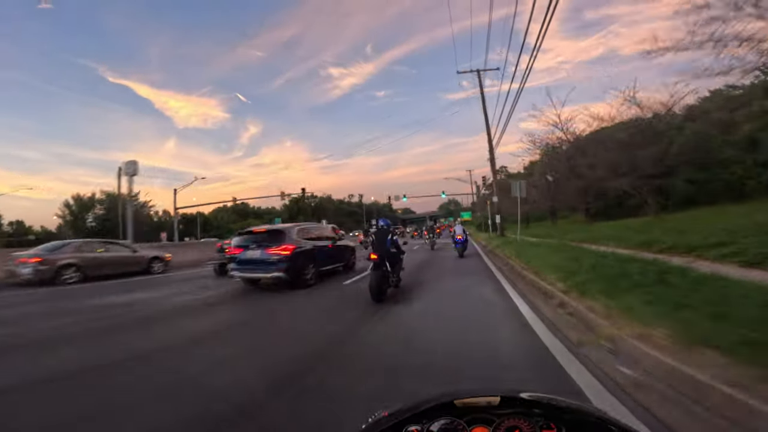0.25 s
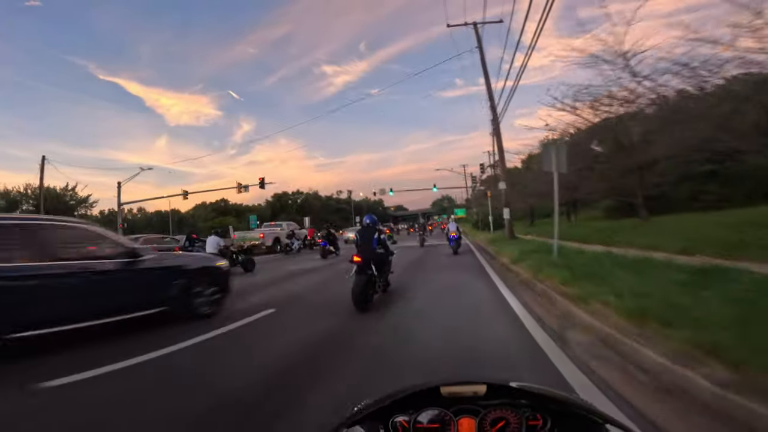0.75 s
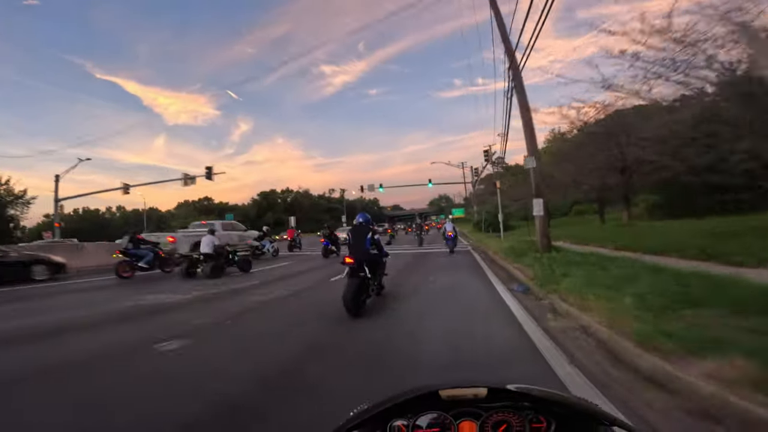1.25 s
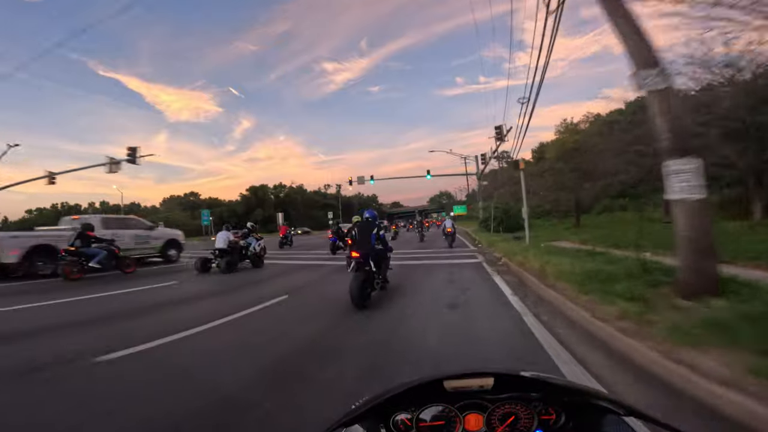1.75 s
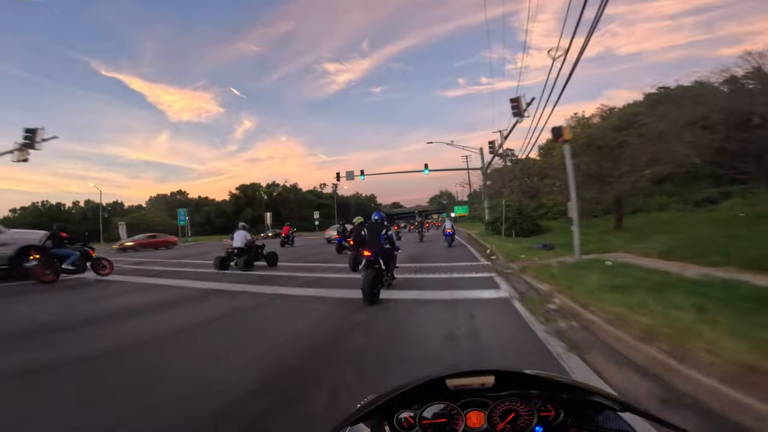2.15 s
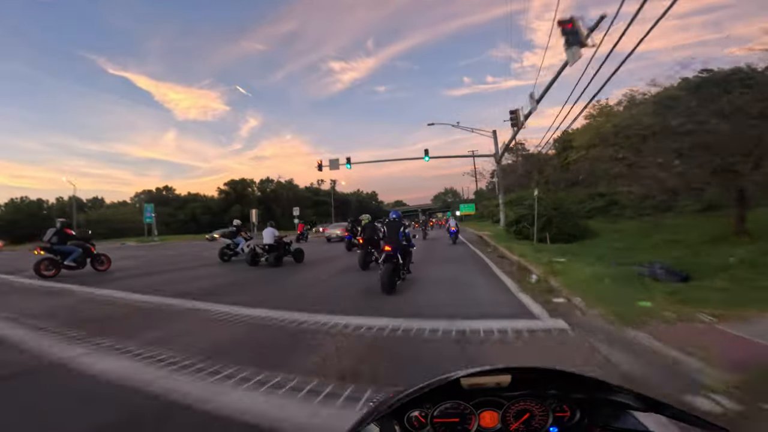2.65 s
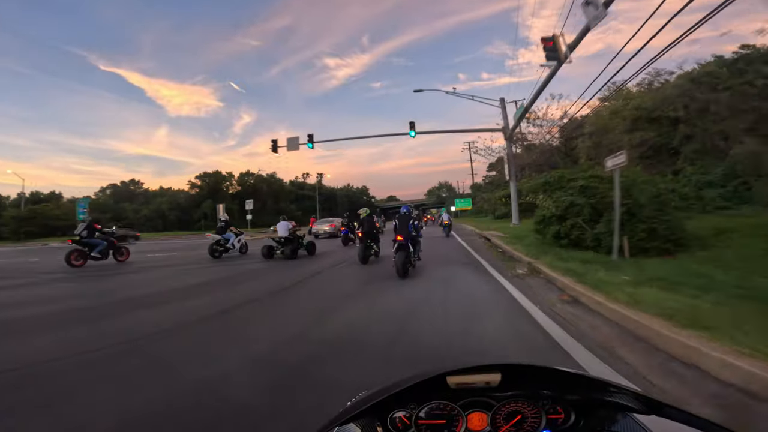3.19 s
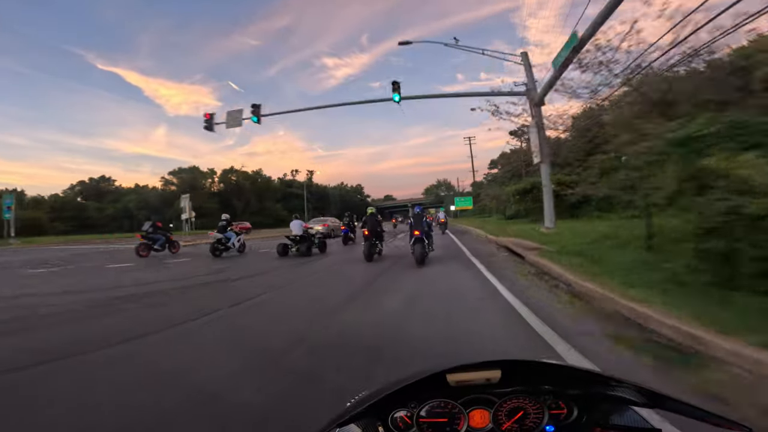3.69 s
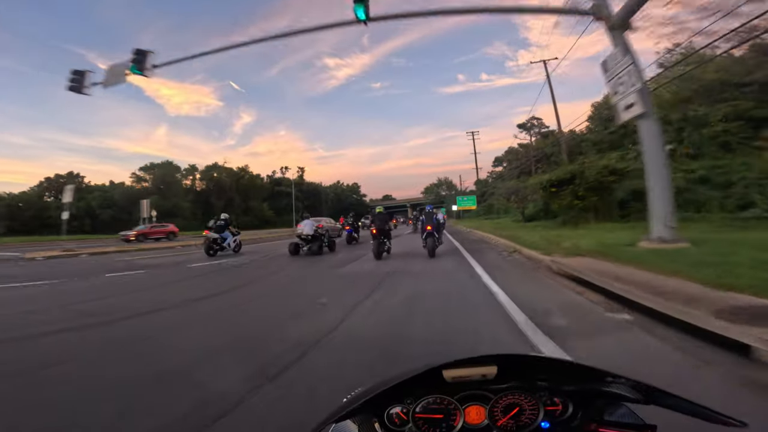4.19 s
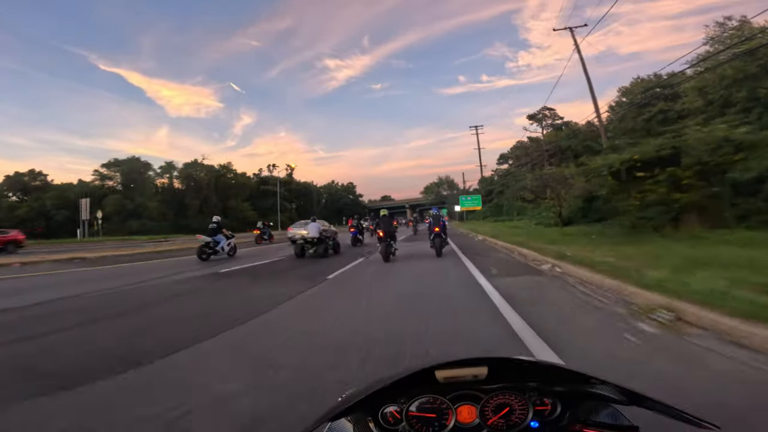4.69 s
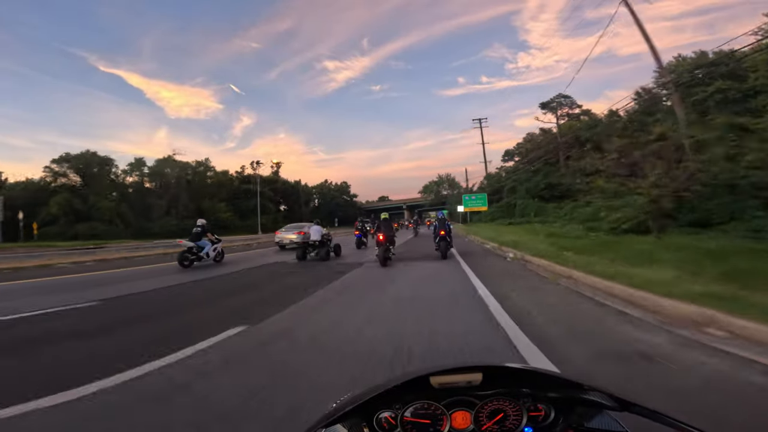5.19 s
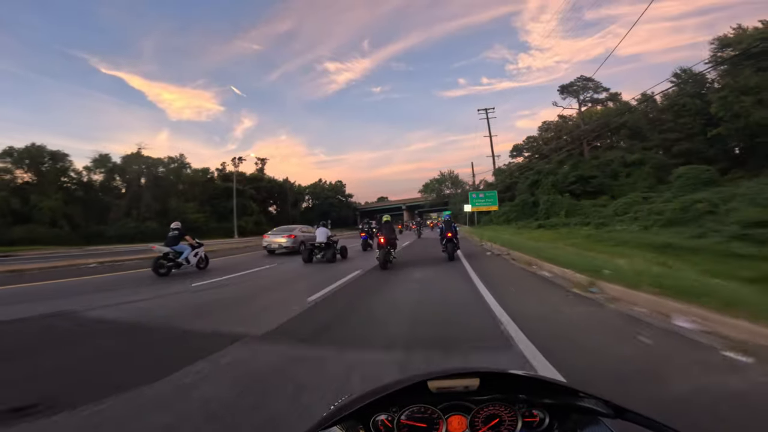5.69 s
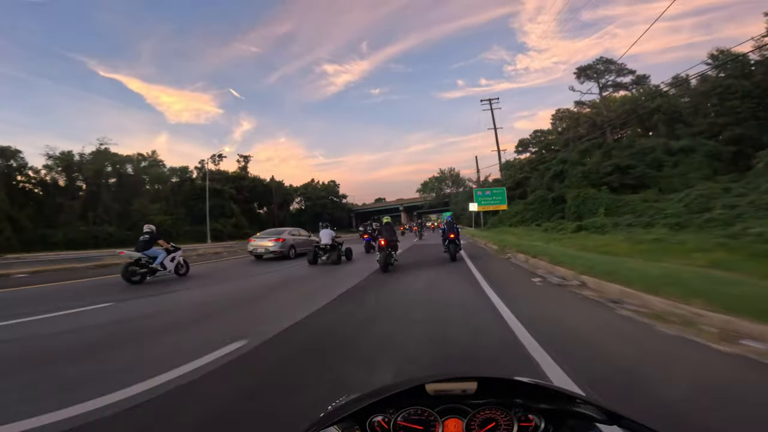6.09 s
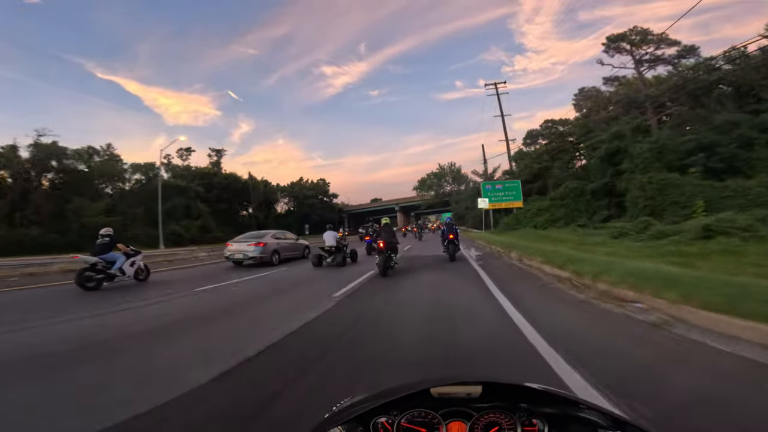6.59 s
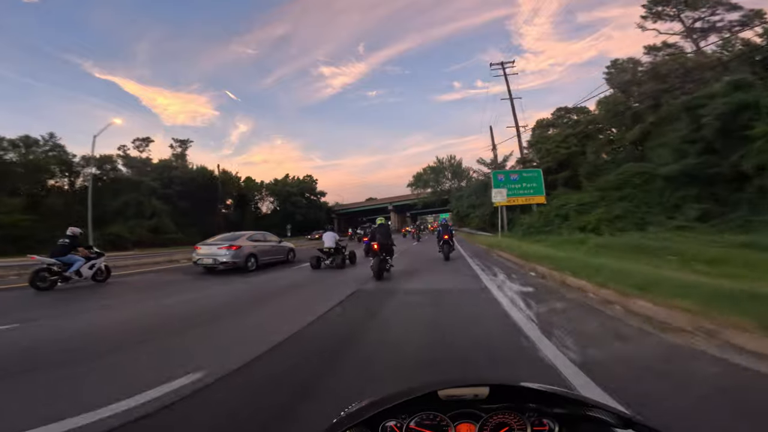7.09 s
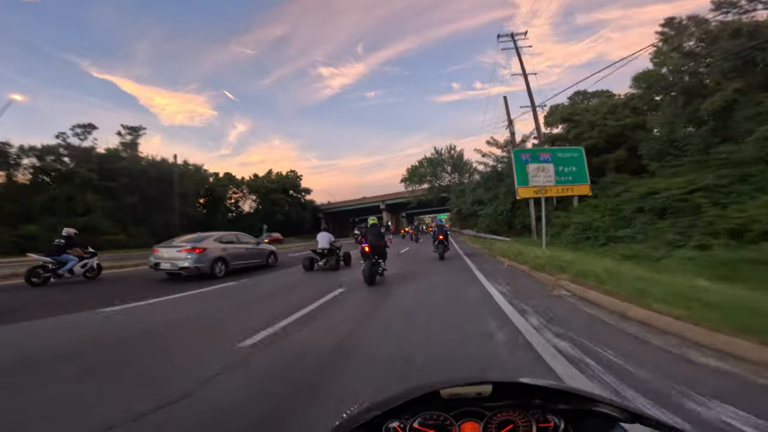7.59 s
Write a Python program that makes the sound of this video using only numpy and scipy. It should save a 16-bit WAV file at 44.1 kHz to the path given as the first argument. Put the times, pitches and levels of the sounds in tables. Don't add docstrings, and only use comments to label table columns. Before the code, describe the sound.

Heard from a moving motorcycle on an open city road, the close engine climbs in pitch then hums steadily, knocking with a ticking loose panel. A rough twin surges, shuts off and pops just after four seconds, while a smooth four-cylinder bike gains speed. Later another rises with bright throttle stabs. Pack drone, wind rumble, hiss and bodywork thumps continue throughout.

```python
import sys
import numpy as np
from scipy import signal
from scipy.fft import rfft, irfft, next_fast_len
from scipy.io import wavfile
from scipy.ndimage import uniform_filter1d, map_coordinates

SR = 44100
rng = np.random.default_rng(int(sys.argv[2]) if len(sys.argv) > 2 else 0)


def undo_db(level):
    steps = np.asarray(level, float) / 20
    return 10 ** steps


def wav_record(signal):
    frames = np.transpose(np.atleast_2d(signal))
    bounded = np.clip(frames, -1, 1)
    quanta = np.round(bounded * 32767).astype(np.int16)
    wavfile.write(sys.argv[1], SR, quanta)


N = 346185
TIME = np.arange(N) / SR
SLOW = TIME[::32]

# time_s, cycle_rate_hz, nearness_db, throttle_0_to_1
OWN_RIDE = [(0.0, 40.73, -0.5, 0.89), (0.18, 40.85, -2.5, 0.7), (0.7, 42.98, -6.5, 0.92),
            (1.05, 44.3, -2, 0.77), (1.4, 46.33, -1, 0.75), (1.92, 50.39, -1.5, 0.73),
            (2.45, 54.4, -5, 0.88), (2.62, 53.94, 0, 0.5), (2.97, 53.68, -7, 0.1), (3.85, 53.35, -1.5, 0),
            (4.38, 53.3, -1.5, 0.51), (4.9, 53.85, 3.5, 0), (5.07, 54.64, 1, 0.35), (5.78, 56.05, 3, 0.17),
            (6.3, 56.57, 1, 0.29), (6.82, 55.95, 1, 0.13), (7.18, 55.74, 1, 0.4), (7.85, 55.75, -2, 0.3)]
TWIN_RIDE = [(0.0, 24.34, -3, 0.11), (0.35, 25.02, -0.5, 0.046), (0.7, 24.33, 1.5, .02),
             (1.22, 22.69, -0.5, 0.016), (1.58, 22.23, 2, 0.22), (1.75, 24.6, 0, 0.43),
             (2.1, 31.86, 2, 0.68), (2.28, 31.64, -2, 0.75), (2.45, 28.67, -3, 0.79),
             (2.62, 28.14, -2, 0.65), (2.8, 29.18, 0.5, 0.79), (2.97, 31.56, 2, 0.65),
             (3.5, 37.45, 0, 0.87), (4.03, 43.05, -1.5, 0.95), (4.07, 42.78, 2.5, 0.13),
             (4.6, 36.37, 1, 0.64), (4.75, 36.1, -3, 0.096), (5.95, 34.64, 1.5, .1)]
RACER_RIDE = [(5.4, 31.28, -8.5, 0.21), (5.9, 33.4, -5.5, 0.33), (6.85, 38.65, -0.5, 0.51),
              (6.97, 39.75, 0.5, 0.56), (7.15, 41.25, 3.5, 0.23), (7.45, 45.3, 0.5, 0.75),
              (7.55, 46.63, 1, 0.78), (7.78, 48.94, 0, 0.92), (7.85, 50.5, 0.5, 0.44)]
CRUISER_RIDE = [(3.6, 29.84, -14, 0.33), (3.95, 32.07, -1.5, 0.35), (4.65, 33.39, 0.5, 0.46),
                (5.35, 34.47, -1.5, 0.11), (6.05, 35.88, -2.5, 0.4), (6.4, 36.34, -5, 0.88),
                (6.75, 36.41, 2.5, 0.51), (7.45, 36.99, -2.5, 0.69), (7.8, 37.09, 1.5, 0.61)]
# multiple_of_cycle_rate, level_db
OWN_TONES = [(1, -25), (2, -26), (3, -27.5), (4, -24.5), (5, -22), (6, -26), (7, -28.5), (8, -30), (9, -28),
             (10, -30.5), (11, -29), (12, -25.5), (13, -22.5), (14, -36), (15, -27.5), (16, -29), (17, -28),
             (18, -28.5), (19, -29.5), (20, -30), (21, -32.5), (22, -33), (23, -29.5), (24, -35),
             (25, -29.5), (26, -28.5), (27, -28), (28, -28.5), (29, -31)]
TWIN_TONES = [(2, -31), (2.988, -27.5), (3.993, -34), (4.998, -22.5), (5.99, -26), (8.05, -26),
              (9.025, -31.5), (10.05, -30), (11.02, -26), (11.88, -31), (13.08, -28), (14.04, -29),
              (15.99, -31.5), (16.91, -29.5), (18.1, -31), (18.87, -28), (19.95, -29.5), (7.025, -34),
              (15, -33.5), (20.88, -35), (22, -34), (23, -30), (24, -32.5), (25.4, -35), (25.9, -30.5),
              (27.4, -29.5)]
RACER_TONES = [(2, -34), (4, -20.5), (6, -34.5), (8, -24), (10, -36), (12, -18), (16, -29), (20, -22),
               (22, -36), (24, -22.5), (28, -22), (32, -23.5), (36, -23.5), (40, -32.5)]
CRUISER_TONES = [(3, -39.5), (4, -28.5), (6, -30.5), (7, -35), (8, -28), (9, -27), (11, -43.5), (12, -24),
                 (14, -28), (16, -29.5), (20, -30.5), (24, -29), (28, -30.5), (36, -29.5)]
OWN_GROUPS = (5, 10, 14)
TWIN_GROUPS = (4, 5, 14)
RACER_GROUPS = (4, 12, 22)
CRUISER_GROUPS = (6, 10, 14)
# low_db, firing_db, middle_db, high_db
OWN_OPENS = [3.5, 5.3, 0.3, 9.1]
TWIN_OPENS = [1.5, -2, 5, 6]
RACER_OPENS = [0.3, 3.7, 6, 2.8]
CRUISER_OPENS = [0.3, 1.5, 4, 9]
# pitch_hz, level_db
SHELTER = [(60, -8), (120, 2.5), (170, 0.5), (212, 2.5), (270, -1.5), (420, 3), (520, -7.5), (600, -12),
           (690, -9), (760, -18), (830, -16.5), (950, -24), (1150, -30), (1800, -31)]
# pitch_hz, width_hz, full_throttle_db
AIRBOX = [(212, 39, 3.5), (405, 40, 4.5), (650, 40, 1.5), (829, 45, 10), (1087, 120, 14.5)]

# time_s, pitch_hz
PANEL_PITCH = [(0, 7490), (1.62, 7500), (1.7, 6840), (1.85, 7350), (1.9, 6850), (2.38, 6820), (2.54, 6400),
               (4, 7400), (4.7, 7200), (4.9, 6860), (5.7, 6920), (6.1, 7260), (7.85, 6860)]
# pitch_hz, width_hz,
# rest_level_db
PANEL_MODES = [(5100, 550, -67), (8200, 700, -72), (9400, 1100, -73.5), (11500, 1200, -80),
               (13400, 1300, -81)]
# start_s, full_s, end_s, strength_db
MODE_SPELLS = [
    [(2.0, 2.2, 2.3, 13), (3.4, 3.6, 3.1, 21.5), (5.3, 5.45, 5.6, 12), (6.7, 6.8, 7.4, 8.5)],
    [(.85, .9, 1.85, 9), (2.0, 2.15, 2.5, 12), (5.5, 5.58, 5.63, 10), (6.7, 6.95, 7.1, 9)],
    [(1.55, 1.6, 2, 7), (1.9, 2.15, 2.3, 14.5), (2.42, 2.47, 2.52, 18), (3.5, 3.8, 3.6, 9),
     (4.75, 4.85, 5.0, 5), (5.1, 5.3, 5.45, 8.5), (5.45, 5.55, 5.62, 14.5), (5.7, 5.8, 6, 6),
     (6.8, 6.95, 7.0, 8.5), (7.2, 7.3, 7.9, 13.5)],
    [(1.55, 1.7, 2, 11.5), (1.95, 2.05, 2.3, 11), (5.4, 5.55, 6.1, 9), (5.7, 5.9, 6.7, 7.5),
     (6.7, 6.8, 7.35, 11.5), (7.6, 7.7, 8.7, 14.5)],
    [(-.2, -.05, 0, 8), (1.55, 1.7, 1.8, 11), (1.95, 2.05, 2.2, 9), (5.4, 5.55, 6.7, 6),
     (6.7, 6.8, 10, 8.5)],
]
# start_s, full_s, end_s, strength_db
LOOSE_SPELLS = [(.8, .9, 2, 8), (1.68, 1.73, 1.86, 17), (1.86, 1.93, 2.5, 18.5), (2.0, 2.1, 2.3, 21),
                (2.42, 2.47, 2.51, 21), (3.0, 3.6, 4.4, 3.5), (4.06, 4.1, 4.18, 4.5), (4.55, 4.62, 4.75, 7),
                (4.78, 4.86, 5.0, 13), (5.05, 5.15, 5.75, 12.5), (5.35, 5.55, 5.62, 18.5),
                (5.9, 5.95, 6.35, 8), (6.5, 6.55, 5.4, 18), (6.7, 6.95, 6.5, 13)]
# start_s, full_s, end_s, strength_db
STRAIN_SPELLS = [
    (-.3, 0, 2.1, 7.5),
    (3.6, 3.8, 4.45, 5.5),
    (4.5, 4.75, 5.75, 7.5),
    (5.7, 5.8, 9.4, 5),
]
# pitch_hz, width_hz, level_db
CASING = [(1070, 310, 2.5), (2170, 186, 6), (2567, 366, -3), (3850, 350, -8), (5100, 900, -15.5)]

# pitch_hz, width_hz, level_db
PIPE = [(960, 257, 7.5), (1520, 260, 6.5), (2400, 260, -1), (5370, 830, -9), (6650, 620, -15.5)]
# time_s, level_db, length_s
POPS = [
    (4.287, -40, .035),
    (4.408, -39, .015),
    (4.488, -36.5, 0.017),
    (4.642, -41, 0.047),
]

# time_s, level_db
GUSTS = [(0, -19), (.5, -38.5), (1.47, -22), (2.94, -25.5), (3.43, -19.5), (3.92, -25.5), (5.4, -27.5),
         (5.9, -27), (6.4, -26), (7.85, -27)]
# time_s, nearness_db
PACK = [(0, -1.5), (1, -0.5), (1.5, -3), (3.9, -3), (4.4, -7.5), (5.4, -4.5), (6.9, -5.5), (7.85, -2)]
# pitch_hz, level_db_per_hz
WIND_COLOUR = [(8.8, -34), (15, 0), (70, -7.5), (110, -9), (140, -32.5), (240, -120)]
DRONE_COLOUR = [(41, -30.5), (70, -11), (199, -1.5), (372, -5), (415, -5.5), (552, -16.5), (677, -17.5),
                (786, -20), (1210, -30), (1800, -31.5), (2340, -59), (3960, -120)]
HISS_COLOUR = [(900, -29), (1400, -13), (2300, -4.5), (3000, -13), (3450, -17), (5300, -17.5), (7000, -24),
               (9000, -29), (12500, -36.5), (15300, -47), (16500, -83.5)]

# time_s, peak_db,
# top_end_db
JOLTS = [(1.806, -13, -47.5), (1.906, -17, -56), (2.103, -16, -54), (2.385, -12.5, -64.5),
         (2.459, -15.5, -52), (2.757, -10.5, -67), (2.976, -17.5, -63.5), (3.188, -16.5, -60),
         (3.612, -14.5, -57), (3.789, -13, -59), (4.306, -14, -65), (4.409, -13, -66), (4.488, -14, -63),
         (4.629, -16, -60), (5.081, -21, -58), (5.379, -17.5, -51), (5.596, -15, -45), (5.935, -19, -50),
         (6.329, -24.5, -61.5), (6.402, -17.5, -63), (6.774, -17.5, -51), (6.791, -18, -55),
         (6.841, -14.5, -58), (6.877, -19.5, -52), (7.03, -17.5, -52.5), (7.2, -17.5, -55),
         (7.561, -15.5, -52), (7.711, -20, -48.5)]
# pitch_hz, width_hz, level_db
BODYWORK = [(700, 570, 0.5), (1500, 560, -6.5), (2300, 830, -11.5)]
# start_s, full_s, end_s, high_tones_gain_db
STABS = [
    (6.05, 6.25, 6.55, 9),
    (6.86, 6.94, 7.06, 13),
    (7.28, 7.34, 7.45, 8),
    (7.47, 7.53, 7.72, 15),
    (7.74, 7.8, 7.9, 13),
]

SETTLE_S = 0.11


def unit(x):
    return x / np.sqrt(np.mean(x ** 2) + 1e-20)


def curves(rows):
    time_s, *columns = np.transpose(rows)
    return [np.interp(TIME, time_s, column) for column in columns]


def sounding(rows, fade):
    inside = np.minimum(TIME - rows[0][0], rows[-1][0] - TIME)
    return np.clip(inside / fade + 1, 0, 1)


def spells(rows, settle_s):
    start, full, end, strength_db = np.transpose(rows)[..., None]
    rise = (SLOW - start) / np.maximum(full - start, 1e-3)
    fall = (end - SLOW) / settle_s + 1
    shape = np.clip(np.minimum(rise, fall), 0, 1)
    return np.interp(TIME, SLOW, np.max(strength_db * shape, axis=0))


def drifting(rate):
    knots = rng.standard_normal(int(N * rate / SR) + 4)
    return map_coordinates(knots, [SLOW * rate])


def wobble(rate):
    return np.interp(TIME, SLOW, drifting(rate))


def along(points, hz):
    point_hz, db = np.transpose(points)
    return np.interp(np.log(hz + 1), np.log(point_hz + 1), db)


def filtered(x, response):
    size = next_fast_len(N + 8192)
    return irfft(rfft(x, size) * response(np.fft.rfftfreq(size, 1 / SR)), size)[:N]


def resonances(modes):
    def response(f):
        total = 0
        for k, (centre, width, db) in enumerate(modes):
            ring = 1j * f * width / (centre * centre - f * f + 1j * f * width)
            total = total + (-1) ** k * undo_db(db) * ring
        return total
    return response


def muffled(modes, top_hz):
    return lambda f: resonances(modes)(f) / (1 + 1j * f / top_hz) ** 2


def rush(colour, patchy_db):
    noise = signal.stft(rng.standard_normal(N), nperseg=512)[2]
    patches = uniform_filter1d(rng.standard_normal(noise.shape), 5, 0)
    patches = unit(uniform_filter1d(patches, 10, 1))
    patchy = signal.istft(noise * undo_db(patchy_db * patches), nperseg=512)[1][:N]
    return unit(filtered(patchy, lambda hz: undo_db(along(colour, hz))))


def bursts(turns, life_s, scatter_db, clean):
    count = np.floor(turns).astype(int)
    strength = undo_db(scatter_db * rng.standard_normal(1000))[count % 1000]
    kicks = np.append(0, np.diff(count) > 0) * strength
    keep = np.exp(-1 / (life_s * SR))
    swell = signal.lfilter([1], [1, -keep ** 3], kicks)
    gate = signal.lfilter([1], [1, -keep], swell)
    return clean * unit(kicks) + unit(gate * rng.standard_normal(N))


def engine(ride, tones, groups, opens_db, rough, unsteady_db, airbox=(), stab_db=0):
    hz, near_db, throttle = curves(ride)
    turns = np.cumsum(hz) / SR
    on = sounding(ride, fade=0.13) > 0
    uneven = (turns + rough * wobble(14))[on]
    group_db = [(near_db + 2 * db * (throttle - 0.5))[::32] for db in opens_db]
    group_db[-1] = group_db[-1] + stab_db
    note = np.zeros(N)
    for multiple, db in tones:
        tone_hz = multiple * hz[::32]
        swing_db = group_db[np.searchsorted(groups, multiple)] + unsteady_db * drifting(7)
        for centre, width, gain_db in airbox:
            swing_db += throttle[::32] * gain_db * np.exp(-((tone_hz - centre) / width) ** 2)
        level = np.interp(TIME[on], SLOW, undo_db(db + swing_db + along(SHELTER, tone_hz)))
        note[on] += level * np.sin(2 * np.pi * (multiple * uneven + rng.random()))
    return np.sqrt(2) * note * sounding(ride, fade=0.19), turns, throttle


def casing_knock(turns, loose_db):
    blows = bursts(turns + 0.28, life_s=0.001, scatter_db=1.2, clean=4.5)
    blows = blows + 0.75 * bursts(turns + 0.8, life_s=0.00065, scatter_db=1.5, clean=1.5)
    blows = blows + 1.8 * rng.standard_normal(N)
    knock_db = -49.5 + 0.2 * loose_db + spells(STRAIN_SPELLS, SETTLE_S)
    return undo_db(knock_db) * unit(filtered(blows, muffled(CASING, top_hz=5000)))


def panel_tick(turns, loose_db):
    taps = bursts(turns + 0.26, life_s=0.0005, scatter_db=1.5, clean=3)
    taps = taps + 0.25 * bursts(turns + 0.5, life_s=0.0004, scatter_db=2.5, clean=0.6)
    broad = filtered(taps, lambda f: 1 / (1 + 1j * f / 620) ** 3)
    pitch_hz = curves(PANEL_PITCH)[0]
    tick = undo_db(-71 + loose_db) * unit(broad * np.sin(2 * np.pi * np.cumsum(pitch_hz) / SR))
    buzz = unit(taps) + 0.55 * rng.standard_normal(N)
    for (hz, width, db), rows in zip(PANEL_MODES, MODE_SPELLS):
        mode = resonances([(hz, width, 0)])
        level_db = db + spells(rows, SETTLE_S / 2) + 2.5 * wobble(25)
        tick = tick + undo_db(level_db) * unit(filtered(buzz, lambda f: mode(f) ** 2))
    return tick


def own_bike():
    note, turns, _ = engine(OWN_RIDE, OWN_TONES, OWN_GROUPS, OWN_OPENS,
                            rough=0.0025, unsteady_db=1.8, airbox=AIRBOX)
    loose_db = spells(LOOSE_SPELLS, SETTLE_S / 2)
    return note + casing_knock(turns, loose_db) + panel_tick(turns, loose_db)


def twin():
    note, turns, throttle = engine(TWIN_RIDE, TWIN_TONES, TWIN_GROUPS, TWIN_OPENS,
                                   rough=0.004, unsteady_db=2)
    puffs = bursts(turns + 0.03, life_s=0.0007, scatter_db=1.2, clean=3)
    puffs = puffs + 0.9 * bursts(turns + 0.65, life_s=0.0007, scatter_db=1.2, clean=3)
    bark = unit(filtered(puffs, muffled(PIPE, top_hz=5130)))
    bark_level = undo_db(-52 + 20.5 * throttle) * sounding(TWIN_RIDE, fade=0.24)
    pops = sum(undo_db(db) * np.exp(-((TIME - s) / length) ** 4) for s, db, length in POPS)
    dull = unit(filtered(bark, lambda f: 1 / (1 + 1j * f / 4000) ** 2))
    return note + bark_level * bark + pops * dull


def wind():
    rumble = unit(undo_db(wobble(14)) * rush(WIND_COLOUR, patchy_db=1.0))
    return undo_db(curves(GUSTS)[0] + 0.5) * rumble


def pack_drone():
    level_db = -14.5 + curves(PACK)[0] + 0.73 * wobble(6.6)
    return undo_db(level_db) * rush(DRONE_COLOUR, patchy_db=1.0)


def road_hiss():
    hz = curves(OWN_RIDE)[0]
    speed_db = 3.5 * np.log2(hz / hz.mean())
    level_db = -42.5 + speed_db + 0.53 * curves(PACK)[0] - 4 * curves(TWIN_RIDE)[2]
    return undo_db(level_db + 0.56 * wobble(30)) * rush(HISS_COLOUR, patchy_db=1.5)


def jolts():
    thump, splash, t = np.zeros(N + SR), np.zeros(N + SR), TIME[:1200]
    for s, db, top_db in JOLTS:
        start = round(s * SR)
        thump[start] = undo_db(db)
        splash[start:start + len(t)] += undo_db(top_db) * np.exp(-t / 0.002) * rng.standard_normal(len(t))
    body = muffled(BODYWORK, top_hz=1800)
    dull = filtered(thump[:N], lambda f: body(f) / (1 + 1j * f / 3000) ** 2)
    bright = filtered(splash[:N], lambda f: resonances([(11000, 6000, 0)])(f) ** 2)
    return undo_db(23) * dull + undo_db(2) * bright


def cruiser():
    return engine(CRUISER_RIDE, CRUISER_TONES, CRUISER_GROUPS, CRUISER_OPENS,
                  rough=0.004, unsteady_db=2)[0]


def shift_puff():
    hiss = unit(filtered(rng.standard_normal(N), lambda f: resonances([(13000, 3500, 0)])(f) ** 2))
    return undo_db(-67 + 4 * wobble(60)) * np.exp(-((TIME - 4.13) / 0.06) ** 2) * hiss


def racer():
    stab_db = spells(STABS, SETTLE_S)[::32] - 6
    return engine(RACER_RIDE, RACER_TONES, RACER_GROUPS, RACER_OPENS,
                  rough=0.004, unsteady_db=2.5, stab_db=stab_db)[0]


def scene():
    bikes = own_bike() + twin() + cruiser() + racer()
    air = wind() + pack_drone() + road_hiss()
    ending = np.clip((TIME[-1] - TIME) / 0.006, 0, 1)
    return ((bikes + air + jolts() + shift_puff()) * ending)[None]


def low_pass(x):
    return signal.sosfilt(signal.butter(12, 15800, fs=SR, output="sos"), x)


def record(dry):
    loudness = np.sqrt(np.abs(uniform_filter1d(dry ** 2, 2500, axis=1)) + 1e-6)
    even = dry * (0.32 / loudness) ** 0.5
    rounded = even / (1 + np.abs(even) ** 5) ** 0.2
    return low_pass(rounded)


dry = scene()
out = record(dry)
wav_record(out)
```